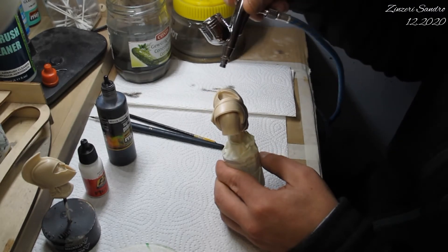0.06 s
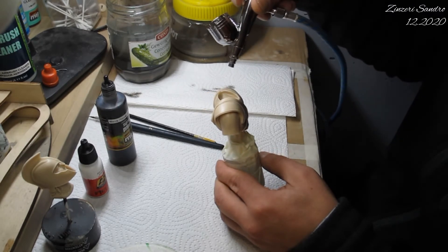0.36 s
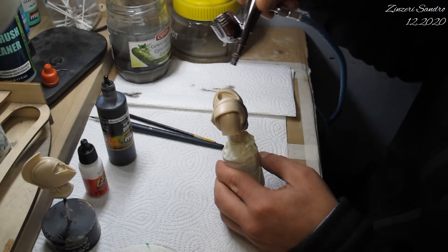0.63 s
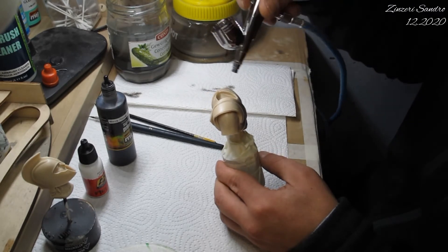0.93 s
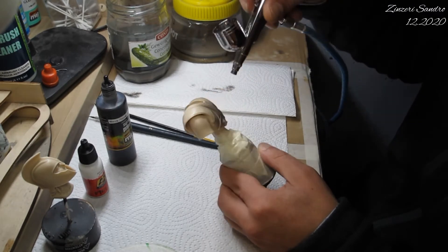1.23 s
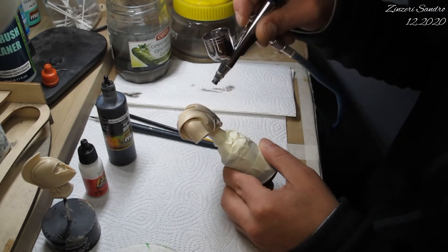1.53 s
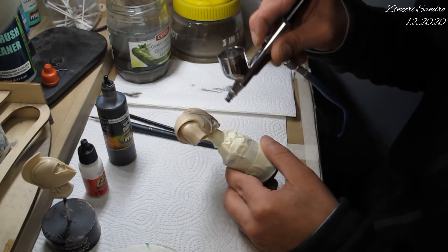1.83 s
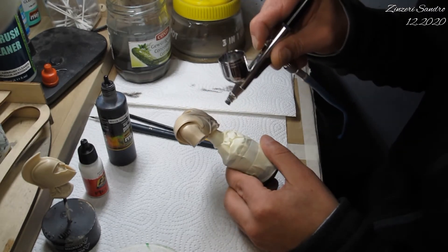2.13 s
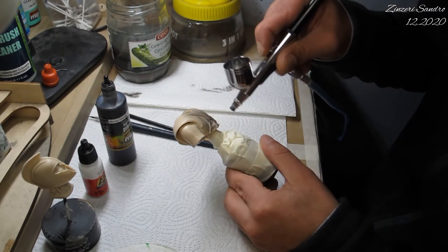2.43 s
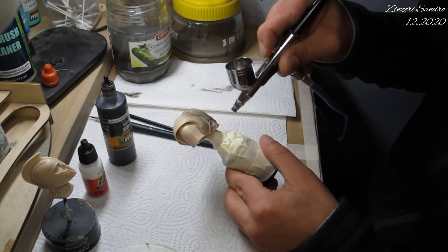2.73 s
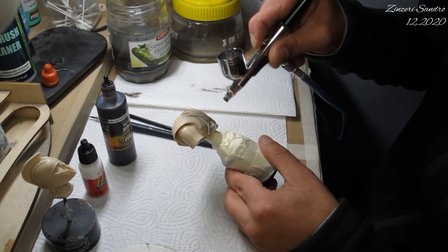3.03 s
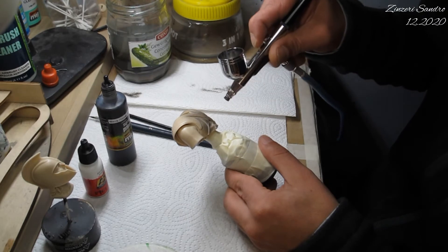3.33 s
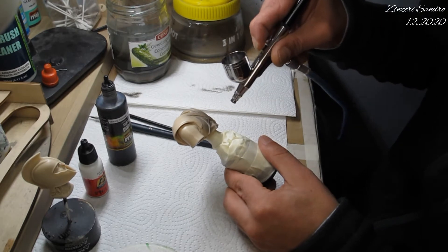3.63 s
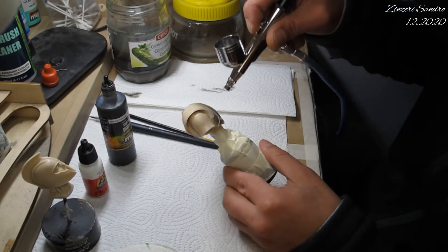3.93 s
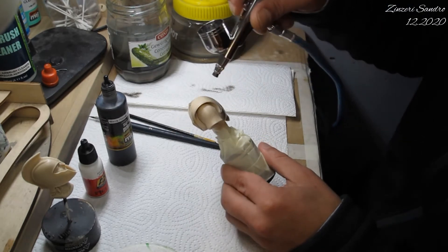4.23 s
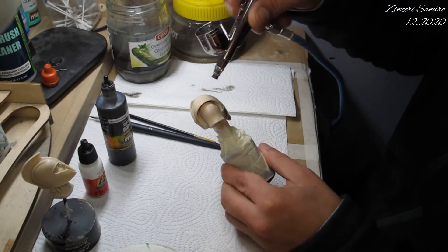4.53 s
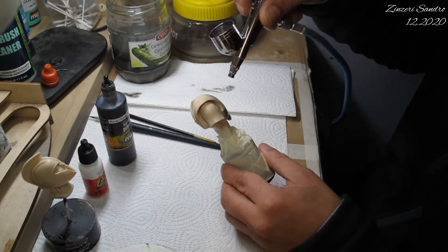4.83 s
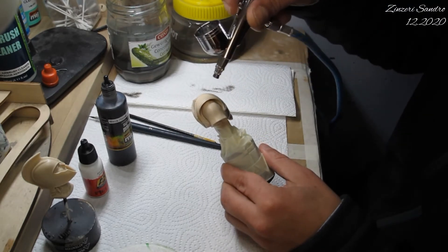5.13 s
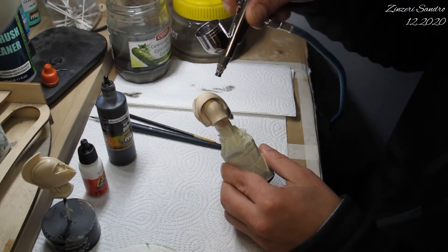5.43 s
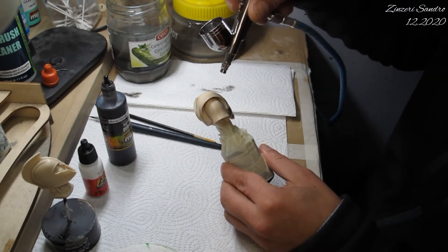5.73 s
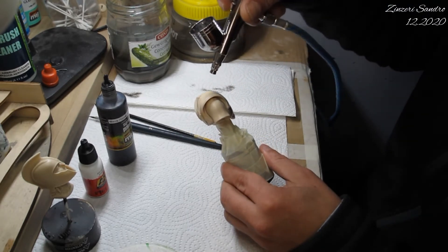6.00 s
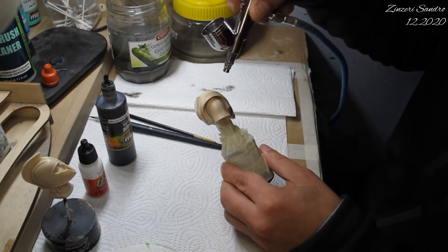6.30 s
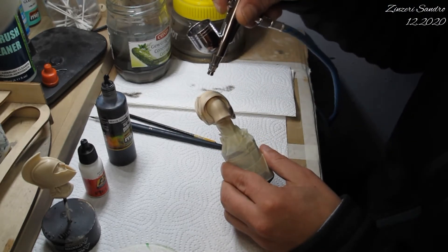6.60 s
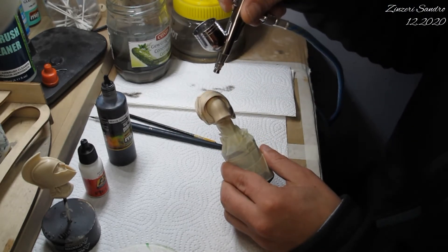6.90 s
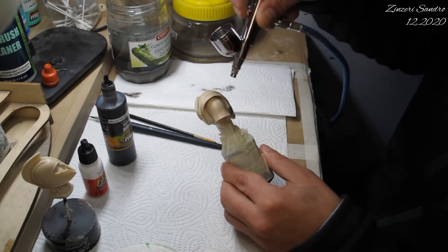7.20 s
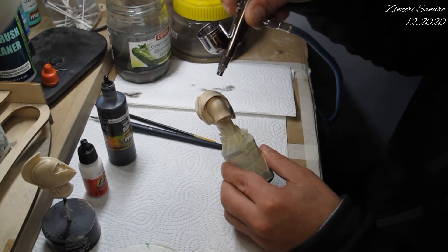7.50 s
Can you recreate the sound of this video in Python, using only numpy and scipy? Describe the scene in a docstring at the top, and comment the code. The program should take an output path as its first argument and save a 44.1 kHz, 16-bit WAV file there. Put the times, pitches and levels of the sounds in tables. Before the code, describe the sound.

An airbrush sprays a small figure at close range, its continuous hiss swelling in short, irregular trigger strokes. A thin fizz of paint and breathy whistles come and go on top. In the first half the jet gains a soft, hollow roar and lightly puffs at the microphone; later the strokes spread out and the hiss sharpens. A piston compressor throbs, knocks and hums steadily behind it in a quiet room.

```python
"""An airbrush sprays a small figure on a workbench, close up, its hiss swelling with each trigger stroke.
The jet roars softly in the figure's hollows and whistles on its edges; atomised paint fizzes on top,
and stray air puffs at the microphone. Behind it a piston compressor throbs, knocks and rattles over
a motor hum and room tone. Two microphone ports colour the stereo image; gain control ducks the peaks."""
import sys
import numpy as np
from scipy import signal
from scipy.fft import rfft, irfft, next_fast_len
from scipy.io import wavfile
from scipy.ndimage import uniform_filter1d, map_coordinates

SR = 44100
rng = np.random.default_rng(int(sys.argv[2]) if len(sys.argv) > 2 else 0)


def materialize(psi):
    """Save the field psi as 16-bit PCM at rate SR to the path in sys.argv[1].

    A 1-D psi becomes a single channel; in a 2-D psi each row is a channel.
    """
    bounded = np.clip(np.atleast_2d(psi).T, -1, 1)
    quanta = np.round(bounded * 32767).astype(np.int16)
    wavfile.write(sys.argv[1], SR, quanta)


N = 341775

# trigger strokes, each a pass of the jet: (start t/s, length/s, edge/s, level/dB, hollow boost/dB)
TRIGGER_STROKES = [(0, 0.032, 0.032, -26.5, 6), (0.169, 0.15, 0.031, -21.5, 0),
                   (.335, 0.13, 0.034, -21.5, -1), (0.545, 0.067, .016, -26.5, 3.5),
                   (.61, 0.13, .02, -31.5, 6), (0.878, 0.13, 0.026, -18.5, -3), (0.969, 0.16, .018, -25, 2),
                   (1.853, .061, 0.037, -25.5, 1), (1.999, 0.068, 0.018, -23.5, -0.5),
                   (2.068, 0.073, .02, -28, 1.5), (2.144, 0.063, .02, -23, 0.5),
                   (2.28, .065, 0.025, -22.5, 2), (2.369, 0.057, 0.027, -21, 1),
                   (2.541, 0.16, 0.017, -25.5, -.5), (2.814, 0.06, 0.025, -21, 1.5),
                   (3.092, 0.13, 0.04, -23, 3.5), (3.236, 0.1, 0.044, -21, 2),
                   (3.423, 0.064, 0.044, -18.5, 2), (3.693, 0.077, 0.035, -18, -2),
                   (3.974, 0.4, 0.017, -30, 2), (4.502, .13, .051, -21.5, -2),
                   (5.063, 0.13, 0.05, -22, -2.5), (5.306, 0.1, .036, -25, 0),
                   (6.13, 0.13, 0.052, -26.5, -0.5), (6.398, 0.25, .051, -22, -18),
                   (6.715, 0.078, .039, -23.5, -1), (6.808, 0.18, 0.099, -16, -9.5),
                   (7.43, 0.25, 0.056, -21.5, -14)]
# air that keeps flowing between the strokes: (t/s, level/dB)
IDLE_AIR = [(0, -29), (.5, -34.5), (.75, -30.5), (1.2, -35.5), (1.53, -31.5), (1.75, -34), (2.5, -39.5),
            (2.77, -38.5), (2.93, -31), (3.55, -32.5), (3.9, -30.5), (4.44, -36), (4.7, -29), (5.6, -27.5),
            (6.05, -30.5), (6.7, -29), (7.22, -34.5), (7.75, -32)]
# the hiss sharpens as the nozzle swings towards the microphone: (t/s, treble level/dB)
NOZZLE_AIM = [(0, -1), (.9, -0.9), (1.3, 0), (2.8, -0.5), (4.4, -2), (5.4, -1.5), (6.25, 1.3), (7.75, 2.5)]
# tone of the free jet: (f/Hz, relative level/dB)
HISS_SPECTRUM = [(600, -28.5), (1480, -25.5), (1850, -14), (2550, -10), (3150, -11.5), (4000, -3.5),
                 (4700, -1), (5300, -2.5), (5900, -7), (7100, -7.5), (8000, -12.5), (9300, -26),
                 (12000, -40), (15700, -48)]
# the roar rises as the jet lands full on the figure: (t/s, level/dB relative to the flow)
ROAR_LEVEL = [(0, -30), (1.1, -28), (1.4, -11.5), (1.87, -9.5), (2.05, -12), (2.2, -9), (2.35, -15),
              (2.6, -11.5), (2.85, -15), (3.2, -8.5), (3.4, -18.5), (3.56, -2.5), (3.74, -15), (4.0, -20),
              (4.6, -20.5), (5.3, -35), (6.3, -27), (7.75, -31)]
# tone of the jet breaking on the figure: (f/Hz, relative level/dB)
ROAR_SPECTRUM = [(200, -20), (600, -3.5), (1200, 9.5), (1900, 5), (3100, 4), (5000, -28)]
# the needle is drawn far back and more paint atomises: (start t/s, length/s, edge/s, level/dB)
PAINT_BURSTS = [(0, .05, .02, -38), (0.193, .25, .035, -37.5), (.57, 0.11, .035, -38),
                (.88, 0.12, .03, -45), (4.51, 0.13, 0.048, -33.5), (5.06, .13, 0.055, -31),
                (5.316, 0.21, .04, -40)]
# tone of the paint mist: (f/Hz, relative level/dB)
FIZZ_SPECTRUM = [(3000, -12), (6000, -3.5), (8500, 3), (10000, 0.5), (12000, -4), (15700, -13)]
# throb of the piston: (multiple of the crank rate, level/dB)
PISTON_HARMONICS = [(1, -57), (2, -57), (3, -47.5), (4, -53), (6, -58), (7, -52), (10, -63.5)]
# valve and housing knocks in each turn: (share of the turn, f/Hz, t60/s, level/dB, looseness 0-1)
VALVE_KNOCKS = [(0.0022, 1104, 0.044, -29.5, .1), (.42, 1062, 0.2, -39.5, 0.09),
                (0.382, 314.5, 0.029, -47, 0.35), (.64, 317, 0.044, -40.5, 0.84),
                (.34, 582, 0.034, -46, 0.9), (.75, 570, 0.05, -43, 0.75)]
# tone of the compressor's small contacts: (f/Hz, relative level/dB)
RATTLE_SPECTRUM = [(150, -21), (220, -10), (290, -9.5), (430, 3), (470, -21), (520, -1.5), (620, -4),
                   (680, -12.5), (800, -3.5), (980, -1.5), (1090, 2.5), (1250, -5), (1600, -38)]
# lines of the motor hum: (f/Hz, level/dB)
MOTOR_LINES = [(31.5, -59), (49.5, -60), (94.5, -42.8), (100, -57), (121.7, -55.5), (143.2, -45.5),
               (189, -50.3)]
# tone of the room's air: (f/Hz, relative level/dB)
ROOM_SPECTRUM = [(15, -20), (45, -25.5), (140, 3.5), (230, -4), (460, -5.5), (580, 3), (690, -6),
                 (950, 0.5), (1200, 3), (1500, -5.5), (3000, -12), (15000, -50)]
# the jet splits on a rim: (start t/s, end t/s, f/Hz, width/Hz, level/dB relative to the flow)
EDGE_TONES = [(.17, .48, 4730, 200, -7.5), (.2, .75, 4040, 90, -10.5), (.72, 1.158, 5290, 110, -2),
              (2.1, 2.21, 5760, 200, -4), (3.1, 3.46, 4730, 110, -9), (3.48, 3.673, 5080, 110, -1),
              (4, 6.7, 4570, 110, -16), (6.747, 7.05, 4860, 120, -4)]
# stray air reaches the microphone: (peak t/s, half-width/s, level/dB)
AIR_PUFFS = [(.75, .15, -52), (3.2, 0.15, -40), (3.65, 0.11, -45)]
# tone of that wind rumble: (f/Hz, relative level/dB)
PUFF_SPECTRUM = [(15, -15), (45, -2), (65, 7), (100, 0), (250, -42)]
# how alike the stereo noise is at the two microphone ports: (f/Hz, correlation 0-1)
PORT_LIKENESS = [(100, 0.77), (500, 0.93), (2000, 0.91), (4500, 0.75), (7000, 0.64), (15000, .46)]
# balance of the ports: (f/Hz, left minus right level/dB)
PORT_BALANCE = [(100, 4), (700, 2.5), (1100, 7), (1700, 0.5), (2700, 4), (3600, 2), (4150, 8), (4700, 16),
                (5400, 8), (6300, -3.5), (7500, -8), (10000, -4.5), (15000, -1)]
# phase between the ports: (f/Hz, left lead/rad)
PORT_LEAD = [(100, 0), (1100, -0.52), (1600, 0.57), (3400, -0.92), (4200, -0.2), (5000, -2.02),
             (6000, -1.64), (7500, -1.47), (11000, -0.87)]


def amp(db):
    """Decibels to gain."""
    return 10 ** (np.asarray(db) / 20)


def unit(x):
    """Scale to rms 1."""
    return x / np.sqrt(np.mean(x ** 2) + 1e-20)


def along(points, hz):
    """Read (f/Hz, value) points on a log frequency axis."""
    f, values = np.transpose(points)
    return np.interp(np.log(hz + 1), np.log(f + 1), values)


def clock():
    """The time of every sample in seconds."""
    return np.arange(N) / SR


def envelope(points):
    """Join (t/s, value) points with straight ramps."""
    return np.interp(clock(), *np.transpose(points))


def gate(start, length, edge):
    """A valve opens smoothly, holds and closes again."""
    t = clock() - start
    return (1 + np.tanh(t / edge)) * (1 + np.tanh((length - t) / edge)) / 4


def wobble(rate):
    """A smooth random curve, rate knots a second."""
    knots = rng.standard_normal(int(N * rate / SR) + 4)
    return map_coordinates(knots, [clock() * rate], mode="nearest")


def filtered(x, response):
    """Shape x with a complex frequency response."""
    size = next_fast_len(N + SR // 2)
    return irfft(rfft(x, size) * response(np.fft.rfftfreq(size, 1 / SR)), size)[..., :N]


def crossover(x, edge_hz):
    """The bands of x below and above a frequency."""
    low = filtered(x, lambda hz: 1 / (1 + (hz / edge_hz) ** 12))
    return low, x - low


def narrow_noise(centre_hz, width_hz):
    """Noise of rms 1 ringing in one resonance."""
    resonance = lambda hz: 1 / (1 + (2 * (hz - centre_hz) / width_hz) ** 2)
    return unit(filtered(rng.standard_normal(N), resonance))


def rush(spectrum, patchy_db):
    """Rushing air: stereo noise of rms 1 with narrow, drifting patches of gain."""
    bins = signal.stft(rng.standard_normal((2, N)), nperseg=1024)[2]
    patches = uniform_filter1d(rng.standard_normal(bins.shape), size=3, axis=1)  # blur in frequency
    patches = uniform_filter1d(patches, size=18, axis=2)  # and in time
    noise = signal.istft(bins * amp(patchy_db * unit(patches)))[1][:, :N]
    spread = lambda hz: np.arccos(np.clip(along(PORT_LIKENESS, hz), -1, 1)) / 2
    colour = lambda hz: amp(along(spectrum, hz)) * [np.cos(spread(hz)), np.sin(spread(hz))]
    mid, side = filtered(noise, colour)
    return unit(np.array([mid + side, mid - side]))


def airflow(idle_hollow_db=2.5):
    """Level and hollow boost of the jet in dB: the strokes add their power to the idling air."""
    idle_db = envelope(IDLE_AIR)
    power, hollow_power = amp(idle_db) ** 2, amp(idle_db + idle_hollow_db) ** 2
    for start, length, edge, db, hollow_db in TRIGGER_STROKES:
        stroke_power = (amp(db) * gate(start, length, edge)) ** 2
        power += stroke_power
        hollow_power += stroke_power * amp(hollow_db) ** 2
    return 10 * np.log10(power), 10 * np.log10(hollow_power / power)


def bench_echoes(x, reach_s=.012, echo_db=-9, count=16):
    """Jars and bench add weak early echoes, whose pattern shifts as the hand moves."""
    out = x.copy()
    for delay in rng.uniform(.08, 1, count) * reach_s:
        echo = np.roll(x, int(delay * SR), axis=-1)
        out += amp(echo_db) / np.sqrt(count) * wobble(2.198) * echo
    return unit(out)


def jet_hiss(hollow_db, landing_db):
    """Turbulent hiss, hollower as it lands on the figure, sharper as it aims at the microphone."""
    hiss = bench_echoes(rush(HISS_SPECTRUM, patchy_db=2.0))
    hollow, upper = crossover(hiss, edge_hz=3640)
    core, treble = crossover(upper, edge_hz=5160)
    hollow_gain = amp(hollow_db + 0.048 * landing_db)
    return amp(1.31) * (hollow_gain * hollow + core + amp(envelope(NOZZLE_AIM)) * treble)


def jet_roar(roar_db):
    """A lower roar as the jet breaks on the figure at close range."""
    return amp(roar_db) * rush(ROAR_SPECTRUM, patchy_db=4.5)


def paint_mist(flow_db, landing_db):
    """Atomised paint: a thin fizz that grows with flow and landing, plus bursts from the needle."""
    thin = amp(-43 + 0.26 * (flow_db - flow_db.mean()) + 0.073 * landing_db)
    bursts = sum(amp(db) * gate(start, length, edge) for start, length, edge, db in PAINT_BURSTS)
    return np.hypot(thin, bursts) * rush(FIZZ_SPECTRUM, patchy_db=3.0)


def airbrush():
    """Hiss, roar and whistles ride the airflow together, with the paint mist on top."""
    flow_db, hollow_db = airflow()
    roar_db = envelope(ROAR_LEVEL)
    landing_db = roar_db - roar_db.mean()  # how fully the jet hits the figure
    flutter_db = .4 * wobble(22)  # the finger is never quite steady
    sputter_db = 0.11 * wobble(130)  # paint leaves the needle unevenly
    jet = jet_hiss(hollow_db, landing_db) + jet_roar(roar_db) + edge_whistles()
    return amp(flow_db + flutter_db + sputter_db) * jet + paint_mist(flow_db, landing_db)


def piston_throb(turns):
    """The piston chugs in low harmonics locked to the crank."""
    return sum(np.sqrt(2) * amp(db) * np.sin(2 * np.pi * (multiple * turns + rng.random()))
               for multiple, db in PISTON_HARMONICS)


def valve_knocks(turns, attack_s=0.0044, scatter_db=0.57, slack_s=.0003):
    """The valves strike at the same places in every turn, never quite alike."""
    out = np.zeros(N)
    t = np.arange(SR // 6) / SR
    whole_turns = np.arange(int(turns[-1]) + 1)
    for share, hz, t60, db, looseness in VALVE_KNOCKS:
        late, force = rng.standard_normal((len(whole_turns), 2)).T
        times = np.interp(whole_turns + share, turns, clock()) + slack_s * looseness * late
        onsets = np.clip(times * SR, 0, N - 1).astype(int)
        blows = np.bincount(onsets, amp(db + scatter_db * force), N)
        ring = np.sin(2 * np.pi * hz * t) * amp(-60 * t / t60) * (1 - np.exp(-t / attack_s)) ** 2
        out += signal.fftconvolve(blows, ring / np.abs(ring).max())[:N]
    return out


def rattle(turns, per_turn=512):
    """Small contacts repeat in every turn and make a faint buzz."""
    contacts = map_coordinates(rng.standard_normal(per_turn), [turns % 1 * per_turn], mode="grid-wrap")
    return amp(-45) * unit(filtered(contacts, lambda hz: amp(along(RATTLE_SPECTRUM, hz))))


def housing_ring():
    """The compressor's casing keeps singing between the knocks."""
    return amp(-44.5) * narrow_noise(centre_hz=1070.5, width_hz=56)


def compressor(crank_hz=21.62):
    """Each turn of the crank throbs, knocks and rattles, at a barely wavering speed."""
    turns = crank_hz * clock() + .06 + .002 * wobble(1.2)
    return piston_throb(turns) + valve_knocks(turns) + rattle(turns) + housing_ring()


def motor_hum():
    """Low motor lines, slightly unsteady in level and phase."""
    line = lambda hz: np.sin(2 * np.pi * (hz * clock() + rng.random()) + 0.11 * wobble(1.93))
    return sum(np.sqrt(2) * amp(db + 0.45 * wobble(3.14)) * line(hz) for hz, db in MOTOR_LINES)


def room_tone():
    """The room's air lays a quiet, even bed."""
    return amp(-43.5) * rush(ROOM_SPECTRUM, patchy_db=0.5)


def edge_whistles():
    """Breathy edge tones swell and fade where the jet splits on a rim."""
    out = np.zeros(N)
    for start, end, hz, width_hz, db in EDGE_TONES:
        progress = np.clip((clock() - start) / (end - start), 0, 1)
        arch = np.sqrt(np.abs(np.sin(np.pi * progress)))
        out += amp(db) * arch * narrow_noise(hz, width_hz)
    return out


def mic_puffs():
    """Deflected air rumbles briefly on the microphone."""
    swell = sum(amp(db) * np.exp(-((clock() - peak) / width) ** 2) for peak, width, db in AIR_PUFFS)
    return swell * rush(PUFF_SPECTRUM, patchy_db=1)


def mic_ports(hz):
    """Each microphone port has its own resonance, which leans the sound left or right."""
    lean = amp(along(PORT_BALANCE, hz) / 2) * np.exp(.5j * along(PORT_LEAD, hz))
    pair = np.array([lean, 1 / lean])
    return pair / np.abs(pair.mean(axis=0))


def gain_control(x, ceiling_db=-13, recovery_db_per_s=9, window_samples=1300):
    """A loud channel ducks both sides at once, then the gain creeps back."""
    power = np.abs(uniform_filter1d(x ** 2, window_samples, axis=1)).max(axis=0)
    over_db = np.maximum(10 * np.log10(power + 1e-12) - ceiling_db, 0)
    creep_db = recovery_db_per_s * clock()
    duck_db = np.maximum.accumulate(over_db + creep_db) - creep_db
    return x * amp(-duck_db)


def scene():
    """The airbrush up front, the compressor and the room's air behind."""
    return room_tone() + airbrush() + mic_puffs() + compressor() + motor_hum()


def record(dry):
    """Microphone ports, gain control, then a hard cut of the top treble."""
    levelled = gain_control(filtered(dry, mic_ports))
    return filtered(levelled, lambda hz: hz < 15750)


dry = scene()
out = record(dry)
materialize(out)
```